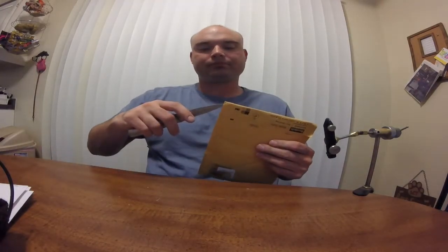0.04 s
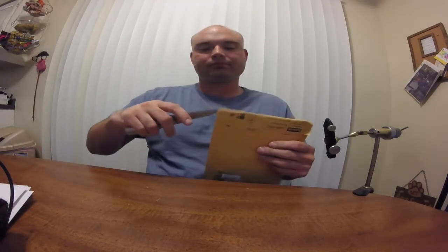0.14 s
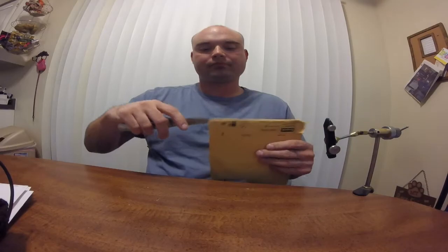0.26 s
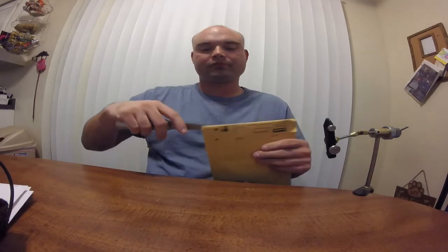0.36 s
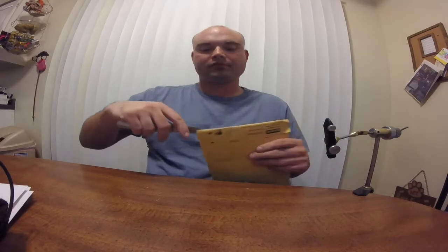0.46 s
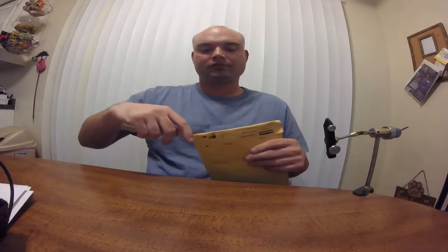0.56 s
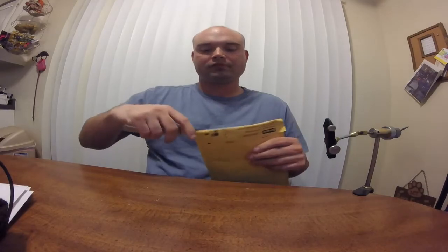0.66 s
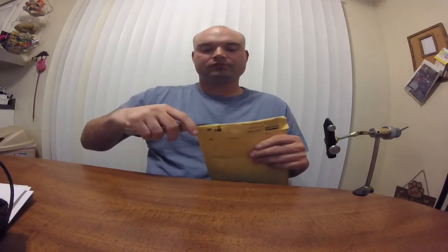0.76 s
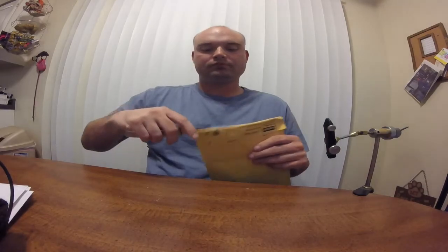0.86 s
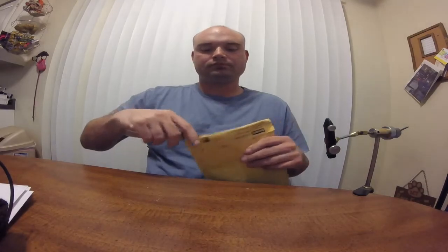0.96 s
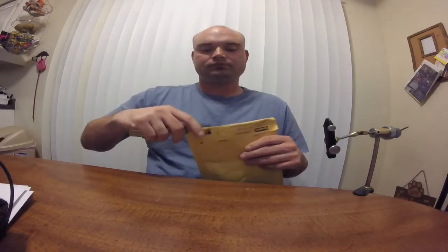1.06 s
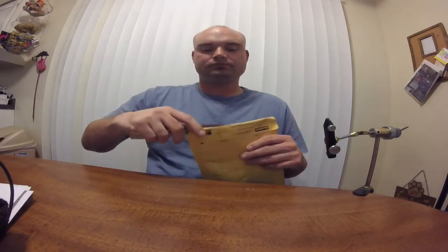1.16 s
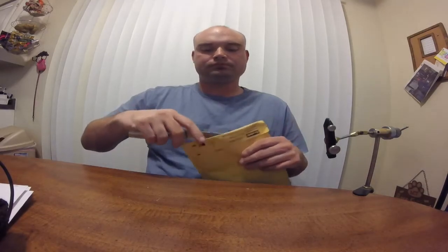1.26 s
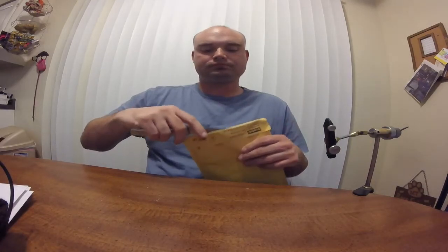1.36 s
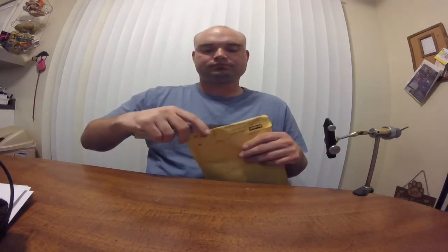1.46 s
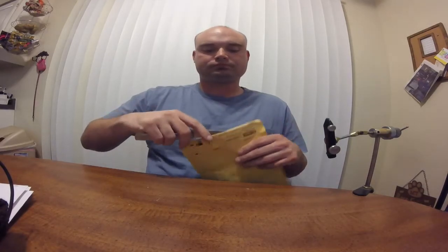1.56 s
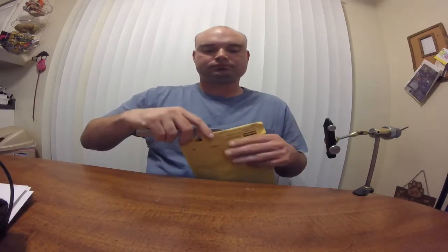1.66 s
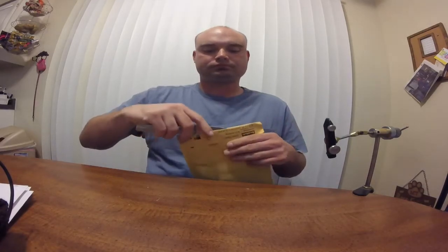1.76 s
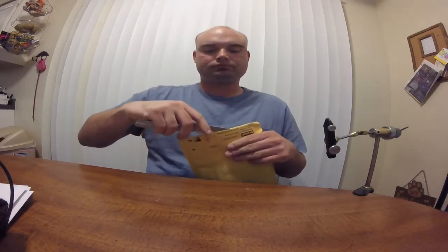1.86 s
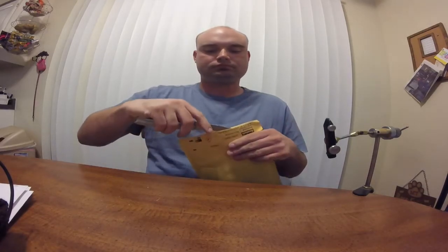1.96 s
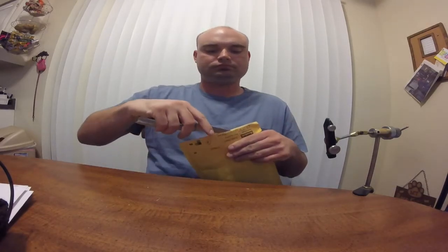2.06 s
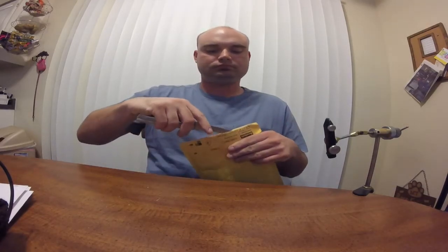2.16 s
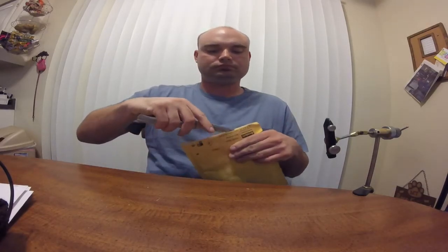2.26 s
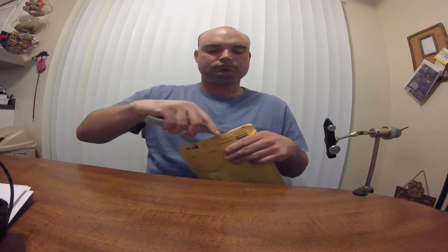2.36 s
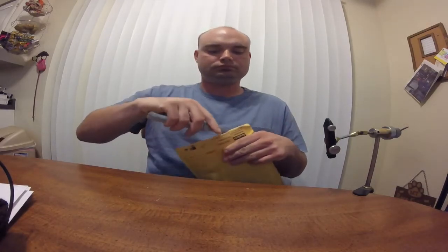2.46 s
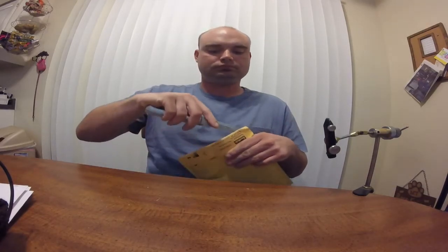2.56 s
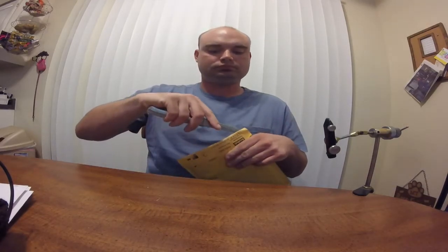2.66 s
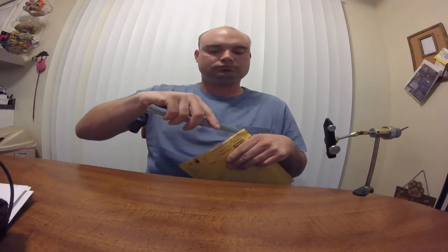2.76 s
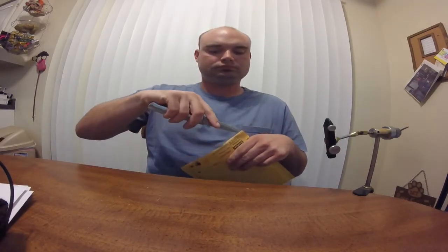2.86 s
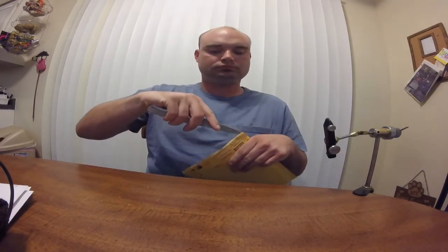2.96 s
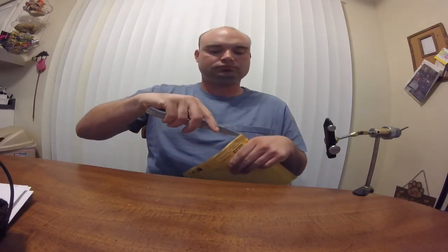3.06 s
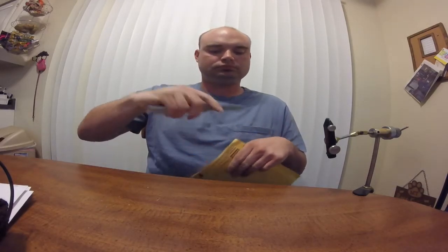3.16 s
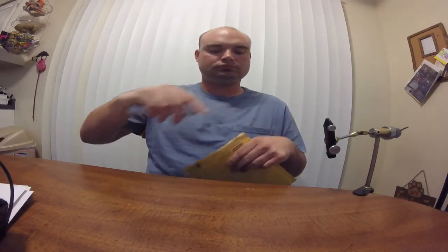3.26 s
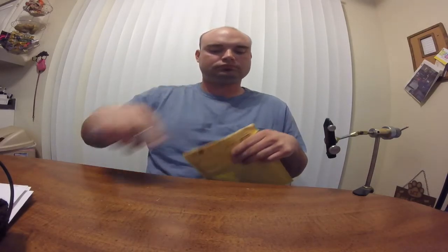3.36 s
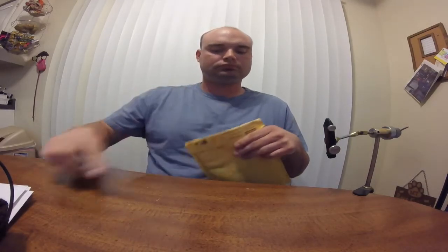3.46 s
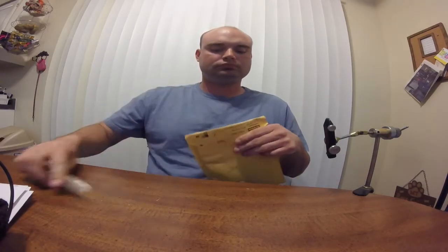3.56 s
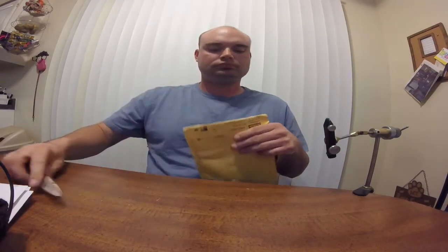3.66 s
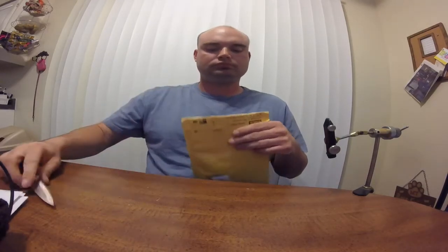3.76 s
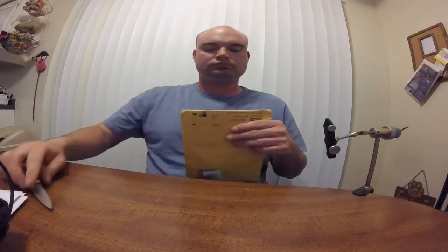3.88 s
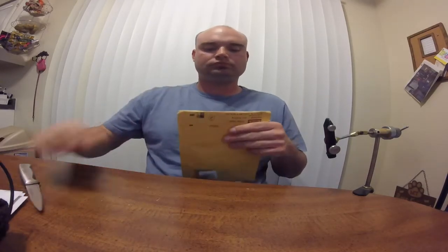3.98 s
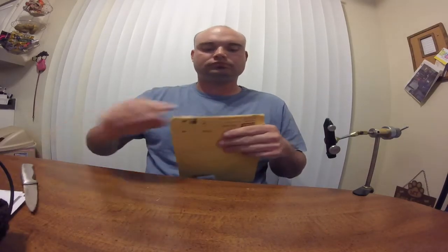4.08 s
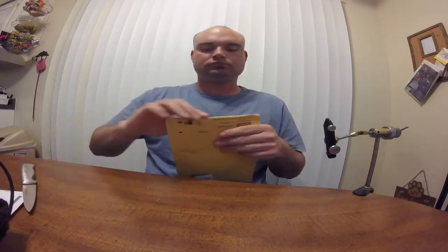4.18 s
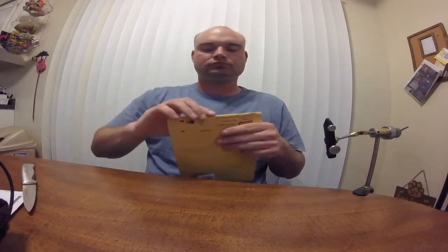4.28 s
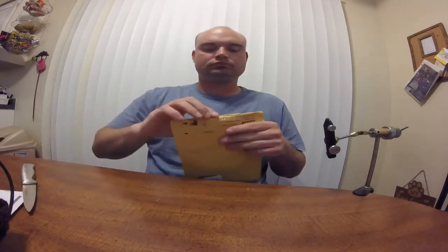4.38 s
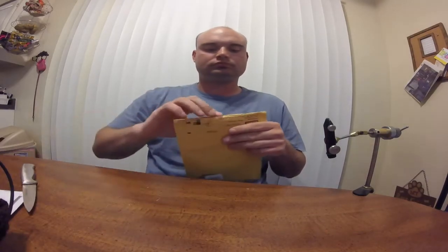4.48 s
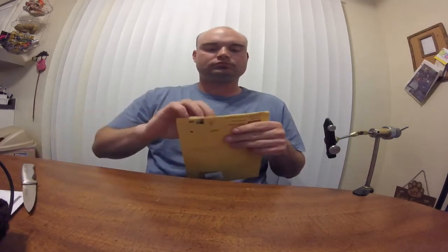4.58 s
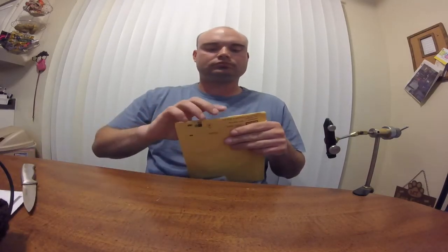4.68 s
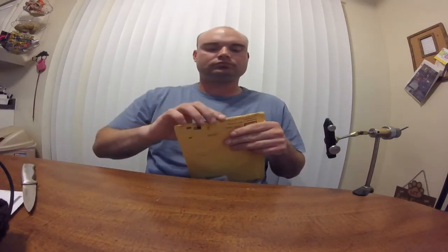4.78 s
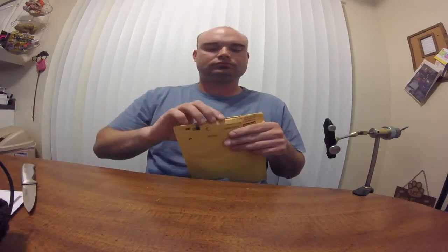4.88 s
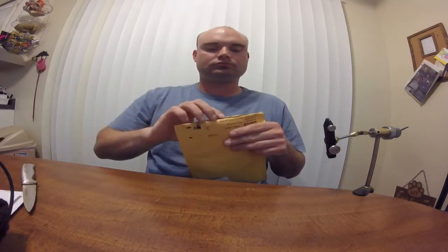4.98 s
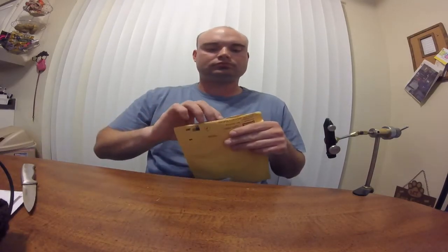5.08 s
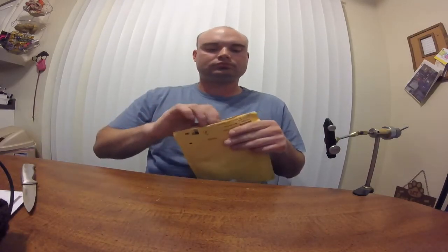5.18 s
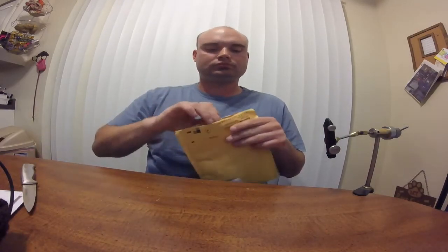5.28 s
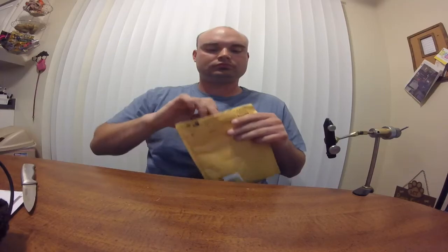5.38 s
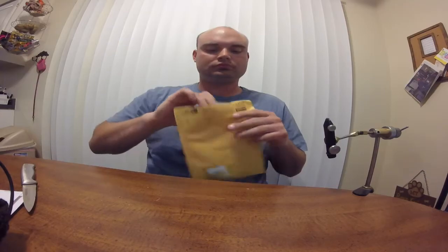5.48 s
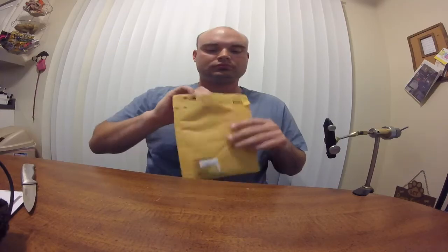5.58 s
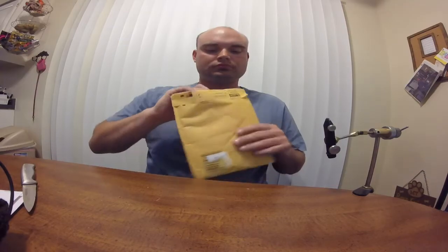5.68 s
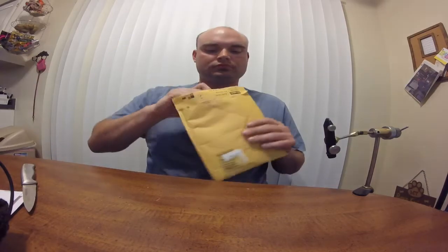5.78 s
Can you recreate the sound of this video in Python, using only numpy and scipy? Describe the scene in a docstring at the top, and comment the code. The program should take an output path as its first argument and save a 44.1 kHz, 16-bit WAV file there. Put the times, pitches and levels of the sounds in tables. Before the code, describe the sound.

A knife saws along a padded paper mailer in scratchy, crackling strokes, then clatters onto a wooden table before fingers rustle the flap open.

```python
"""In a quiet room, at a wooden table, a knife saws along a padded paper mailer close to a microphone.
The blade slips and tears in short strokes: random tiny jolts shake the padding, sheet and fibres.
The paper buckles with dull snaps, made of short thumps, cracks and ticks. The knife is dropped on the
table, bounces and settles as dying tones and noise; then fingers open the flap.
Behind it are shaped room noise and the wavering tones of a humming appliance."""
import sys
import numpy as np
from scipy import signal
from scipy.fft import rfft, irfft
from scipy.io import wavfile
from scipy.ndimage import uniform_filter1d

SR = 44100
rng = np.random.default_rng(int(sys.argv[2]) if len(sys.argv) > 2 else 0)


def log_audio(samples):
    """Write samples as a 16-bit WAV file to the path given in sys.argv[1]."""
    # one column per channel
    frames = np.atleast_2d(samples).T
    # limit to full scale, then quantise
    limited = np.clip(frames, -1, 1)
    pcm = np.round(limited * 32767).astype(np.int16)
    wavfile.write(sys.argv[1], SR, pcm)


N = 257235  # length in samples

# Room noise. Each row: frequency in Hz, relative level in dB per Hz.
AIR_SPECTRUM = [(18, -34), (30, 2), (52, -1), (81, -13.5), (130, -3.5), (187, -9), (330, -5), (432, -17),
                (673, -16), (1020, -26), (1900, -28), (3780, -34), (8060, -46.5), (14300, -50.5),
                (15500, -57)]
AIR_DB = -49.5  # rms level, before its slow drift
# Tones of the appliance. Each row: frequency in Hz, rms level in dB, rms wavering of the pitch in Hz.
HUM_TONES = [(36.8, -57.5, 2.1), (135.4, -51.5, 0.17), (269, -55, 0.66), (293.5, -51.5, 0.52)]
# Echo of the room. Each row: frequency in Hz, time to die by 60 dB in seconds.
ROOM_DECAY = [(100, 1), (500, 0.37), (2000, 0.27), (8000, 0.39)]
DIP_SPACING_HZ, BOUNCE_DB = 1227, -16.5  # spacing of the dips, strength of the reflection

# Knife hitting the table top. Each row: start in seconds, blow level in dB, hardness as treble tilt in
# dB per octave, blade ring in dB relative to the blow, jingle in dB relative to the blow.
KNIFE_BLOWS = [(3.5956, 3.3, 1.1, -48, -36), (3.606, -6, -2, -28, -23), (3.6303, 1.5, 0.94, -54, -50),
               (3.636, -5, -1.5, -54, -42), (3.762, -27, -1.5, -22, -27), (3.774, -17.5, -21, -36, -38),
               (3.784, -22, 2.5, -45, -47), (3.7945, -18.5, 3, -47, -46), (3.807, -15.5, -15, -49, -55),
               (3.819, -23, -19, -43, -50), (3.837, -22, -33, -37, -55), (3.9295, -13.5, -10, -46, -55),
               (3.935, -38.5, -16, -11, -30), (3.9415, -21, -8.5, -30, -48),
               (3.951, -20.5, -21.5, -42, -55), (3.962, -35, -15, -40, -50)]
# Strongest tones of the table top. Each row: frequency in Hz, level in dB relative to the blow,
# time to die by 60 dB in seconds.
TABLE_MODES = [(89.5, -42.5, 0.19), (118, -32, 0.16), (319.7, -22.5, 0.12), (343.6, -17, 0.11),
               (555, -18.5, 0.055), (688, -14.5, 0.1), (667, -8, 0.023), (766, -19.5, 0.051),
               (794, -19.5, .07), (1040, -15, 0.041), (1570, -4.5, 0.013), (1688, -17, 0.036),
               (1840, -16.5, 0.056), (2040, -13.5, 0.04), (2200, -15, 0.055), (2583, -18, 0.039)]
# Many small tones of the table top, as noise. Each row: frequency in Hz, relative level in dB per Hz.
CLATTER_SPECTRUM = [(150, -50), (250, -31), (330, 3), (520, -5.5), (720, 3.5), (920, -11), (1150, -4.5),
                    (1600, -9.5), (2300, -9.5), (2650, -24.5), (3400, -15.5), (6200, -38), (9000, -43.5),
                    (15500, -62)]
# How the clatter dies. Each row: frequency in Hz, time to die by 60 dB in seconds.
CLATTER_DECAY = [(300, 0.075), (800, 0.18), (2000, 0.23), (3500, 0.081), (6000, 0.19), (12000, 0.05)]
# Ringing blade. Each row: frequency in Hz, relative level in dB, time to die by 60 dB in seconds.
BLADE_MODES = [(6420, 5.5, 0.017), (6550, -2.5, 0.02), (8360, -17, 0.012)]
# Loose parts of the knife. Each row: frequency in Hz, relative level in dB per Hz.
JINGLE_SPECTRUM = [(3000, -41), (5000, -12), (8000, 3), (10500, -8), (13500, -24)]
JINGLE_T60 = 0.053  # seconds to die by 60 dB
# Mailer knocking the table edge. Each row: start in seconds, level in dB, frequency in Hz,
# time to die by 60 dB in seconds.
EDGE_THUDS = [(5.59, -22.5, 69.5, 0.06)]

# Buckling paper. Each row: start in seconds, thump peak in dB, thump frequency in Hz, crack peak in dB
# relative to the thump, crack frequency in Hz, tick rms in dB relative to the thump.
PAPER_SNAPS = [(0.39, -26, 624, -11.5, 1950, -28), (0.549, -32, 637, -1, 2100, -25),
               (0.591, -11, 635, -19, 2130, -35), (0.65, -24.5, 474, -6, 3000, -18.5),
               (0.739, -26, 564, -23, 3170, -41), (0.905, -21, 462, -9.5, 2600, -50),
               (0.998, -29, 433, -9, 1960, -26), (1.031, -25.5, 516, 4.5, 2120, -37),
               (1.185, -40.5, 555, 14.5, 2250, -11), (1.207, -25, 390, -29, 1740, -39),
               (1.414, -26, 636, 0.5, 3030, -37), (1.539, -29.5, 503, -2, 2120, -35),
               (1.578, -24.5, 710, -9.5, 1670, -31), (1.691, -36.5, 544, 1.5, 1740, -28),
               (1.726, -23.5, 640, -9, 1640, -29), (1.817, -28.5, 590, -3, 2290, -37),
               (1.91, -26.5, 630, -25, 1350, -35), (2.229, -25, 550, -2.5, 1660, -24),
               (2.373, -27, 730, -12, 1800, -38), (2.477, -21, 664, -5, 1560, -40),
               (2.501, -28, 695, -14, 3140, -40), (2.891, -35.5, 800, -9, 1960, -29),
               (2.978, -30, 470, -15, 2680, -32), (3.101, -27, 750, 4.5, 2000, -21.5),
               (4.314, -22.5, 580, -3.5, 1740, -30), (4.35, -27, 667, -32, 1920, -42),
               (4.41, -32.5, 520, -2.5, 2070, -30), (4.526, -22, 407, -21, 2070, -29),
               (4.608, -25.5, 523, -6.5, 2030, -30), (4.691, -34, 557, 5.5, 1980, -29),
               (4.7, -26, 447, -10, 1930, -33.5), (4.752, -33.5, 676, -6, 2180, -20.5),
               (4.865, -32.5, 630, -11, 1940, -38), (5.033, -28, 450, -10, 1440, -29),
               (5.096, -30.5, 546, 0, 2300, -25), (5.119, -37, 382, 10, 1720, -32),
               (5.131, -32, 670, -6, 1580, -32), (5.263, -27.5, 610, -12, 1960, -34),
               (5.295, -26.5, 630, -2, 2180, -39), (5.302, -17, 640, -3, 1630, -14),
               (5.312, -42, 600, 6, 2020, -20), (5.368, -19.5, 680, -5, 2800, -36),
               (5.438, -22.5, 575, -15, 1940, -26), (5.451, -25, 595, -3.5, 2100, -21),
               (5.588, -12, 530, -17, 2090, -39), (5.61, -24.5, 516, -8, 1980, -22),
               (5.632, -32, 473, 2, 1830, -39), (5.655, -25.5, 600, -8, 1900, -29),
               (5.69, -20, 690, 6, 1960, -22), (5.705, -37, 680, 11, 1820, -19),
               (5.756, -20.5, 570, 1.7, 2000, -33), (5.779, -41, 454, -12, 1920, -13),
               (5.808, -20.5, 650, -16, 2120, -28)]

# Strokes of blade or fingers. Each row: peak time in seconds, rise in seconds, fall in seconds, scrape
# level in dB, padded body in dB relative to the scrape, open pocket frequency in Hz, free sheet
# frequency in Hz, fibre fizz in dB relative to the scrape.
PAPER_STROKES = [(0.604, 0.036, 0.075, -44.5, 2, 550, 2320, -5),
                 (0.7, 0.049, 0.079, -44, 0.5, 584, 2130, -24),
                 (0.775, 0.057, 0.034, -38.5, 5.5, 550, 2120, -32),
                 (0.911, 0.081, 0.062, -46.5, 5.5, 600, 2330, -26),
                 (1.011, 0.028, 0.043, -41, 9, 545, 2250, -14),
                 (1.06, 0.035, 0.04, -27, -4, 557, 2300, -17),
                 (1.097, 0.05, 0.049, -28, -1.5, 500, 3140, -9),
                 (1.201, 0.016, 0.029, -39.5, 0, 527, 2350, -11),
                 (1.273, 0.057, 0.036, -41.5, 6.5, 630, 2220, -9),
                 (1.426, 0.035, 0.065, -38.5, 9, 553, 2590, -16),
                 (1.554, 0.049, 0.085, -46, -15, 480, 2660, -8),
                 (1.852, 0.026, 0.092, -49.5, 16, 540, 2100, -19),
                 (2.149, 0.055, 0.091, -45, 6, 570, 1710, -6),
                 (2.235, 0.022, 0.018, -39.5, 0.1, 530, 2000, -6),
                 (2.393, 0.082, 0.13, -42.5, 3, 746, 1710, -6),
                 (2.496, 0.035, 0.048, -32, 3.5, 713, 2460, -2),
                 (2.537, 0.046, 0.08, -37.5, -0.3, 620, 2320, -3.5),
                 (2.664, 0.035, 0.052, -43.5, -1.5, 660, 2040, -9),
                 (2.81, 0.059, 0.048, -37.5, -1.7, 654, 1750, -6),
                 (3.107, 0.021, 0.02, -38.5, 6, 600, 2100, -7),
                 (4.215, 0.02, .08, -56.5, 4, 577, 2220, -3.5), (4.328, 0.03, 0.1, -51, -4, 544, 2030, -10),
                 (4.53, 0.031, 0.085, -51.5, 9.5, 415, 2280, -1.5),
                 (4.621, 0.027, 0.022, -47.5, 9.5, 617, 2550, -6),
                 (4.696, .032, 0.016, -44, -6, 530, 2070, -5.5),
                 (4.765, .028, 0.036, -52.5, 6, 640, 2370, -4),
                 (4.862, 0.12, 0.036, -56, 6, 590, 2300, -2.5),
                 (5.131, 0.018, 0.028, -49.5, 14.5, 585, 1980, -2),
                 (5.312, 0.027, 0.036, -40, -15, 640, 2210, 0.5),
                 (5.452, .021, 0.036, -44, -1, 615, 2100, -3),
                 (5.601, 0.042, 0.061, -44, 3.5, 606, 2220, -7),
                 (5.704, 0.05, 0.035, -35, -4.5, 678, 1780, -9.5),
                 (5.78, 0.047, 0.17, -40, -2, 600, 2130, -7.5)]
EDGE_DB, SQUARE = -23.5, 1.64  # level at the ends of a stroke; a higher power gives a flatter top
# Drags with a level hold, from brief sharp-edged scrapes to long rustles, under or beside the strokes.
# Each row: start of the hold in seconds, rise in seconds, hold in seconds, scrape level in dB,
# padded body in dB relative to the scrape, free sheet frequency in Hz, fibre fizz in dB relative
# to the scrape.
PAPER_DRAGS = [(0.125, .08, 0.25, -60, 3, 2250, -6), (0.456, 0.17, 0.34, -48.5, -2.5, 2300, -5.5),
               (0.92, 0.077, 0.37, -53, -12, 2500, -1.5), (1.416, .09, .24, -50, -3.5, 2300, -5),
               (1.699, 0.019, 0.18, -49.5, 0, 2100, -3.5), (1.95, .04, 0.12, -60.5, -6, 2300, -4.5),
               (2.111, .015, 0.31, -55, 1, 2200, -1.5), (2.643, .015, 0.032, -49.5, -4, 2030, -7.5),
               (2.764, 0.014, 0.03, -44, 2, 1850, -7), (2.872, .04, 0.13, -62, 3, 2100, -5),
               (3.125, .03, 0.12, -63, -11, 2000, -5), (3.403, 0.091, 0.17, -68, 2.5, 2100, -0.5),
               (4.214, 0.032, 0.23, -62.5, -11, 2300, -0.5), (4.516, .05, 0.18, -55.5, -16, 2350, -2.7),
               (4.854, 0.036, 0.11, -60, -11, 2420, 0.5), (4.983, .035, 0.23, -54, -0.5, 2300, -1.2),
               (5.205, 0.042, .28, -49.5, -5, 2250, -2.5), (5.565, 0.11, .3, -50, -2, 2100, 2)]
DRAG_FALL_S, DRAG_POCKET_HZ = 0.06, 558
HELD_DB = -68.5  # faint rustle of the mailer that is merely held

# Air and padding inside the mailer. Each row: frequency in Hz, width of one filter pass in Hz,
# relative level in dB.
BODY_MODES = [(218, 39, 7), (446, 180, 14), (666, 46, 7.5)]
SHEET_GROWTH = 0.23  # the sheet rings this many dB more for each dB of scrape
# Tearing fibres. Each row: frequency in Hz, relative level in dB per Hz.
FIZZ_SPECTRUM = [(900, -41), (1250, -6.5), (1900, 0), (2500, -6.5), (3350, -1), (3800, -6), (4400, -4.5),
                 (6500, -9), (8150, -7), (9420, -15.5), (13500, -24.5), (15500, -33)]
# Moving peak of the fizz through the sawing and the opening of the flap. Each row: time in seconds,
# frequency in Hz, level in dB relative to the rest of the fizz.
FIZZ_PEAK_PATH = [(0, 5540, -12), (.6, 6600, -23), (1.1, 6400, -1), (1.45, 5700, -13), (1.8, 6460, -10),
                  (2.15, 4600, 4), (2.5, 4700, 6), (2.8, 6040, -12), (4.3, 6600, -16), (5.3, 6050, -26),
                  (5.83, 5570, -8)]
CRINKLES_PER_S, CRINKLE_DB = 45, -10  # single fibres letting go; level relative to the fizz


def amp(db):
    """Turns decibels into a plain gain."""
    return 10 ** (np.asarray(db) / 20)


def evened(x):
    """Scales a sound to rms 1."""
    return x / np.sqrt(np.mean(x ** 2) + 1e-20)


def read(points, hz):
    """Reads a curve between its points, along a logarithmic frequency scale."""
    point_hz, value = np.transpose(points)
    return np.interp(np.log(hz + 1), np.log(point_hz + 1), value)


def add(mix, start_s, sound):
    """Adds a sound to the mix at its start time, cut off at the end of the mix."""
    part = mix[round(start_s * SR):][:len(sound)]
    part += sound[:len(part)]


def coloured(x, points):
    """Filters x by the curve of the points and scales it to rms 1."""
    gain = amp(read(points, np.fft.rfftfreq(len(x), 1 / SR)))
    return evened(irfft(rfft(x) * gain, len(x)))


def resonate(x, hz, width):
    """Shifts the curve hz down to zero, smooths, and shifts back: a resonance of gain 1."""
    turn = np.exp(2j * np.pi * np.cumsum(hz * np.ones(len(x))) / SR)
    r = np.exp(-np.pi * width / SR)
    smooth = signal.lfilter([1 - r], [1, -r], x / turn)
    return 2 * (turn * smooth).real


def band(x, hz, width):
    """Two passes of a resonance that follows the curve hz, scaled to rms 1."""
    return evened(resonate(resonate(x, hz, width), hz, width))


def ring(hz, t60, rise_s, size=6000):
    """A dying sine with a soft start."""
    t = np.arange(size) / SR
    return amp(-60 * t / t60) * (1 - np.exp(-t / rise_s)) * np.sin(2 * np.pi * hz * t)


def burst(peak_s, rise_s, fall_s, size=900):
    """Time from the peak, and an envelope with a bell-shaped rise and an exponential fall."""
    t = np.arange(size) / SR - peak_s
    return t, np.where(t < 0, np.exp(-(t / rise_s) ** 2), np.exp(-t / fall_s))


def dying(x, t60):
    """Lets each band of x decay at its own speed, then scales the whole to energy 1."""
    hz, t, bands = signal.stft(x, SR, nperseg=128)
    decay = amp(-60 * t / read(t60, hz)[:, None])
    out = signal.istft(bands * decay, SR, nperseg=128)[1][:len(x)]
    return out / np.linalg.norm(out)


def wander(span_s):
    """Smooth random drift of rms 1 that changes over span_s."""
    window = np.hanning(int(span_s * SR) + 3)
    return evened(signal.oaconvolve(rng.standard_normal(N), window, "same"))


def slips(per_s, spread_db, clumps):
    """Tiny stick-slip releases of random size and sign; clumps makes them swell and fade."""
    size = clumps * amp(spread_db * np.minimum(rng.exponential(1, N), 5))
    sign = rng.choice([-1., 1.], N)
    happens = rng.random(N) < per_s / SR
    return size * sign * happens


def room_air():
    """Room noise: random air motion with a lumpy rumble and a slow drift in level."""
    level = amp(AIR_DB + .5 * wander(1.0))
    return level * coloured(rng.standard_normal(N), AIR_SPECTRUM)


def appliance_hum():
    """Motor tones of the appliance, each wavering a little in pitch and level."""
    out = np.zeros(N)
    for hz, db, waver_hz in HUM_TONES:
        level = amp(db + .5 * wander(.3)) * np.sqrt(2)  # a sine peaks at root two times its rms
        cycles = np.cumsum(hz + waver_hz * wander(.4)) / SR
        out += level * np.sin(2 * np.pi * cycles)
    return out


def room(x, tail_db):
    """Echoes off the walls: sparse taps of random sign, each band dying at its own speed."""
    taps = np.zeros(SR)
    at = np.arange(300, SR - 20, 20)
    signs = rng.choice([-1., 1.], len(at))
    taps[at + rng.integers(0, 20, len(at))] = signs
    return signal.fftconvolve(x, amp(tail_db) * dying(taps, ROOM_DECAY))[:N]


def bounce(x):
    """An inverted reflection under a millisecond late, from right by the microphone, combs the sound."""
    hz = np.fft.rfftfreq(N, 1 / SR)
    reflection = amp(BOUNCE_DB) * np.exp(-2j * np.pi * hz / DIP_SPACING_HZ)
    return irfft(rfft(x) * (1 - reflection), N)


def edge_thuds():
    """The mailer knocks the table edge, which gives a low, dying tone."""
    out = np.zeros(N)
    for s, db, hz, t60 in EDGE_THUDS:
        add(out, s, amp(db) * ring(hz, t60, 0.0013))
    return out


def knife():
    """Each blow rings the same table top, and the blade; hard blows favour the table's high modes."""
    out = np.zeros(N)
    t = np.arange(6000) / SR
    clatter = amp(12) * dying(coloured(rng.standard_normal(6000), CLATTER_SPECTRUM), CLATTER_DECAY)
    clatter *= 1 - np.exp(-t / 0.00061)  # the small modes fill in after the knock
    top = clatter + sum(amp(db) * ring(hz, t60, 0.00091) for hz, db, t60 in TABLE_MODES)
    octaves = np.log2(np.maximum(np.fft.rfftfreq(8192, 1 / SR) / 700, 1))  # above 700 Hz
    for s, db, hard, blade_db, jingle_db in KNIFE_BLOWS:
        blade = np.zeros(6000)
        for hz, mode_db, t60 in BLADE_MODES:
            blade += amp(mode_db + blade_db) * rng.uniform(0.49, 1) * ring(hz, t60, 0.00028)
        fade = amp(jingle_db - 60 * t / JINGLE_T60)
        jingle = fade * coloured(rng.standard_normal(6000), JINGLE_SPECTRUM)
        # the tilt spreads a little ahead of the blow: 64 samples make room for that
        tilted = np.roll(irfft(rfft(top, 8192) * amp(hard * octaves)), 64)
        add(out, s - 64 / SR, amp(db) * tilted)
        add(out, s, amp(db) * (blade + jingle))
    return out


def snaps():
    """A fold pops over: a brief thump of the padded body, a short crack of the sheet, a bright tick."""
    out = np.zeros(N)
    tick_spectrum = [(1400, -56)] + FIZZ_SPECTRUM[2:-2] + [(12000, -33), (15500, -48)]
    for s, db, hz, crack_db, crack_hz, tick_db in PAPER_SNAPS:
        t, shape = burst(0.00289, 0.00056, 0.002)
        thump = shape * np.cos(2 * np.pi * hz * t)
        t, shape = burst(0.00254, 0.000092, 0.0017)
        crack = amp(crack_db) * shape * np.sin(2 * np.pi * crack_hz * t)
        click = burst(.0024, .0003, .0005)[1] * rng.standard_normal(len(t))
        tick = amp(tick_db) * coloured(click, tick_spectrum)
        add(out, s, amp(db) * (crack + tick - thump))
    return out


def hands():
    """Strokes and drags add their power; the louder ones weigh most in the pitch of pocket and sheet."""
    t = np.arange(0, N + 44, 44) / SR  # a control point every 44 samples
    peak, rise, fall, *stroke = np.transpose(PAPER_STROKES)[:, :, None]
    start, swell, length, drag_db, drag_body, drag_hz, drag_fizz = np.transpose(PAPER_DRAGS)[:, :, None]
    drag = drag_db, drag_body, np.full_like(drag_db, DRAG_POCKET_HZ), drag_hz, drag_fizz
    # distance from the loudest part: 0 there, 1 at the ends
    stroke_away = np.where(t < peak, (peak - t) / rise, (t - peak) / fall)
    drag_away = np.maximum((start - t) / swell, (t - start - length) / DRAG_FALL_S)
    away = np.vstack([stroke_away, np.maximum(drag_away, 0)])
    db, body_db, pocket_hz, sheet_hz, fizz_db = (np.vstack(pair) for pair in zip(stroke, drag))
    # powers, with the held rustle shared out among all rows
    scrape = amp(db + EDGE_DB * away ** SQUARE) ** 2 + amp(HELD_DB) ** 2 / len(db)
    body = amp(body_db) ** 2 * scrape
    fizz = amp(fizz_db) ** 2 * scrape
    gains = [np.sqrt(power.sum(0)) for power in (scrape, body, fizz)]
    pocket = (pocket_hz * body).sum(0) / body.sum(0)
    sheet = (sheet_hz * scrape).sum(0) / scrape.sum(0)
    return [np.interp(np.arange(N) / SR, t, c) for c in (*gains, pocket, sheet)]


def rubbing():
    """Slips shake the padded body, ring the free sheet by the blade, and tear fibres."""
    scrape_gain, body_gain, fizz_gain, pocket_hz, sheet_hz = hands()
    s, *peak = np.transpose(FIZZ_PEAK_PATH)
    fizz_hz, peak_db = (np.interp(np.arange(N) / SR, s, c) for c in peak)
    # one hand drives all, each part lets go alone
    jerk = wander(0.066)
    body_clumps, sheet_clumps, fibre_clumps, fizz_clumps = (
        amp(1.0 * jerk + 2.0 * wander(0.022)) for part in range(4))
    coarse = slips(per_s=1200, spread_db=3.0, clumps=body_clumps)
    fine = slips(per_s=8000, spread_db=2.0, clumps=fizz_clumps)

    pocket = band(coarse, pocket_hz, 276)
    padding = evened(sum(amp(db) * band(coarse, hz, width) for hz, width, db in BODY_MODES))
    body = evened(1.0 * pocket + 0.59 * padding)

    sheet = band(slips(per_s=2800, spread_db=2.5, clumps=sheet_clumps), sheet_hz, 1030)
    fibres = slips(per_s=3300, spread_db=4.0, clumps=fibre_clumps)
    low_fibres = coloured(fibres, FIZZ_SPECTRUM[:6] + [(4400, -45)])
    sheet_gain = 0.67 * (scrape_gain / amp(-44)) ** SHEET_GROWTH
    scrape = sheet_gain * sheet + 0.6 * low_fibres

    fizz = coloured(fine, [(3600, -48)] + FIZZ_SPECTRUM[5:])
    fizz += amp(peak_db) * band(fine, fizz_hz, 2900)
    fizz /= np.sqrt(1 + amp(peak_db) ** 2)  # makes up for the power of the added peak
    single_fibres = slips(per_s=CRINKLES_PER_S, spread_db=3.0, clumps=1)
    crinkles = coloured(single_fibres, [(1500, -26)] + FIZZ_SPECTRUM[3:])
    tearing = evened(fizz) + amp(CRINKLE_DB) * crinkles
    return scrape_gain * scrape + body_gain * body + fizz_gain * tearing


def scene():
    """Near sounds get the room's echo and the close reflection; the background is added as it is."""
    near = rubbing() + snaps() + knife() + edge_thuds()
    heard = bounce(near + room(near, tail_db=-13.5))
    return (heard + room_air() + appliance_hum())[None]


def record(dry):
    """Gain control ducks everything for a moment after a loud sound; peaks clip; then the treble ends."""
    power_db = 10 * np.log10(abs(uniform_filter1d(dry[0] ** 2, 200, origin=99)) + 1e-12)
    fall = np.arange(N) * 54.0 / SR  # the held level sinks by 54 dB a second
    held_db = np.maximum.accumulate(power_db + fall) - fall
    over_db = np.maximum(held_db + 13.5, 0)  # excess above -13.5 dB
    ducked = dry / amp(.45 * uniform_filter1d(over_db, 400, origin=199))
    lowpass = signal.firwin(511, 15300, window=("kaiser", 9), fs=SR)  # cutoff in Hz
    return signal.oaconvolve(np.clip(ducked, -1, 1), lowpass[None], "same")


dry = scene()
out = record(dry)
log_audio(out)
```